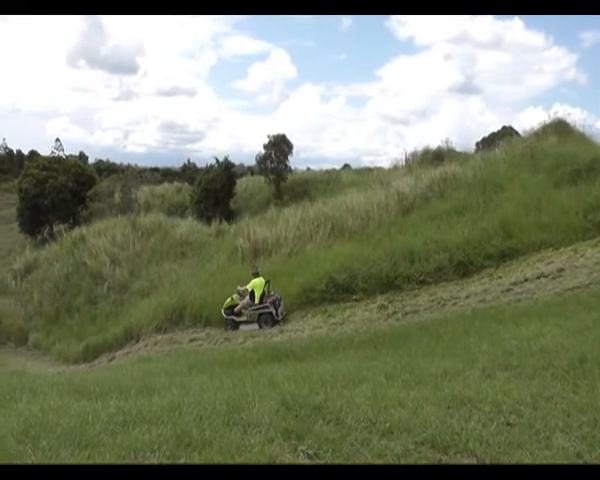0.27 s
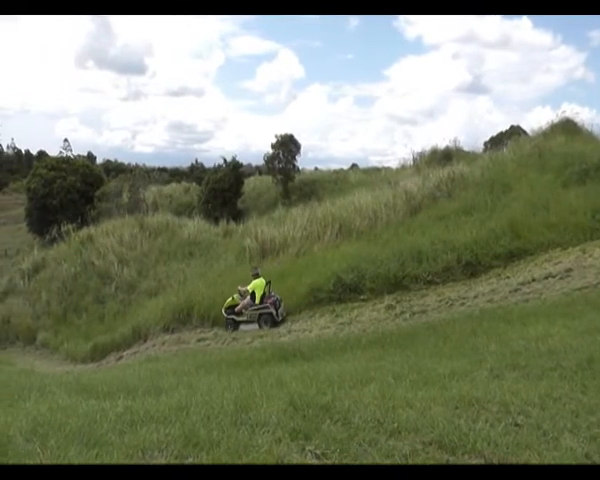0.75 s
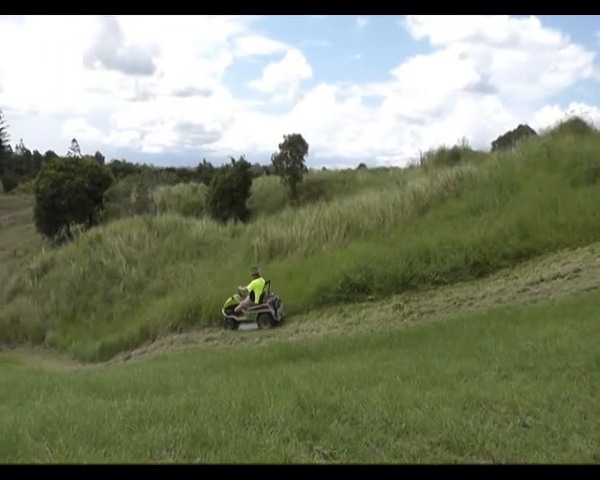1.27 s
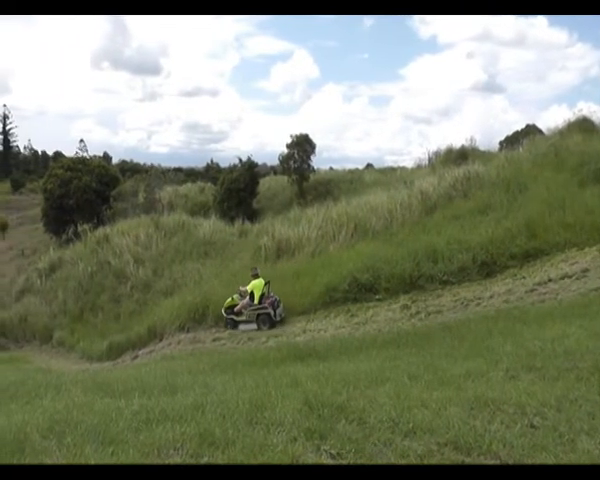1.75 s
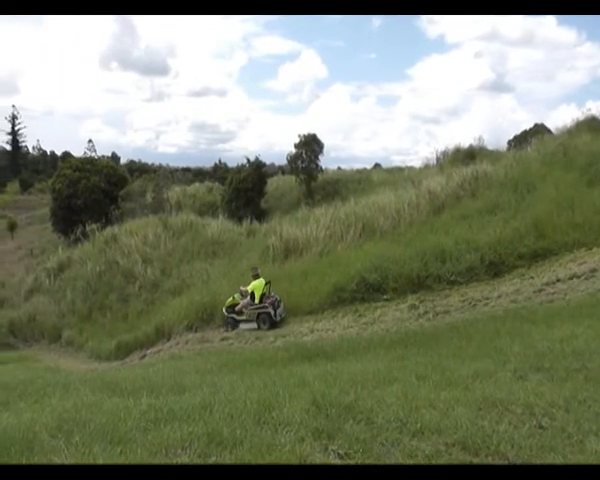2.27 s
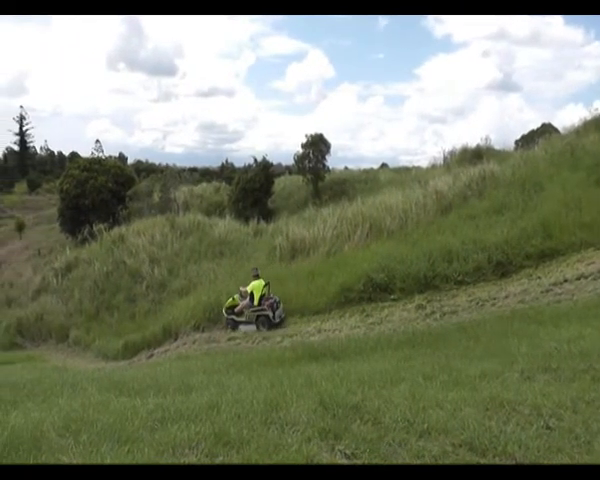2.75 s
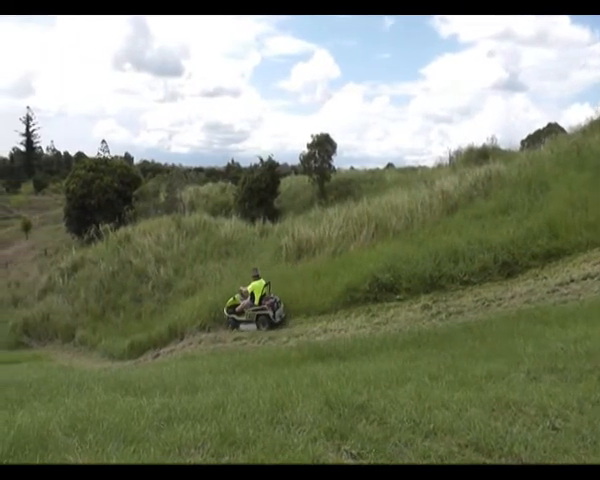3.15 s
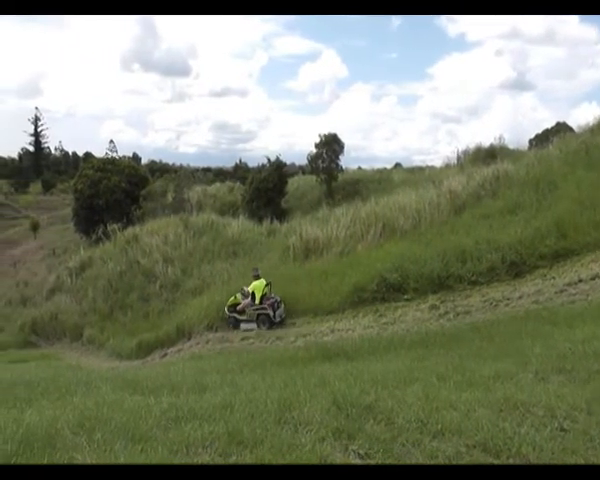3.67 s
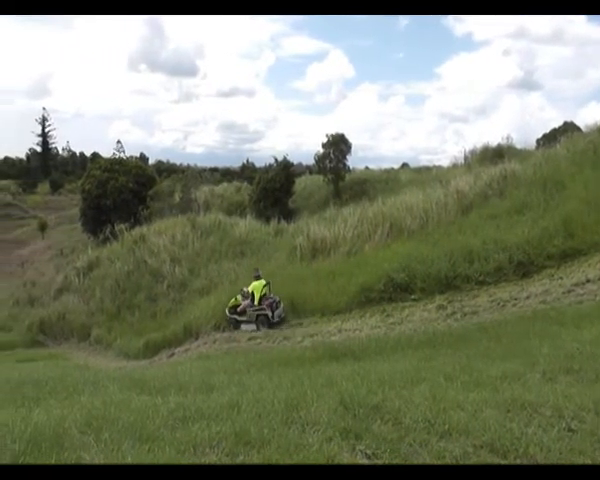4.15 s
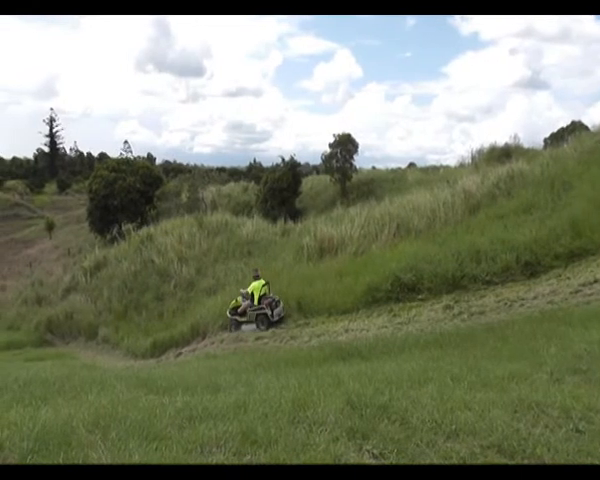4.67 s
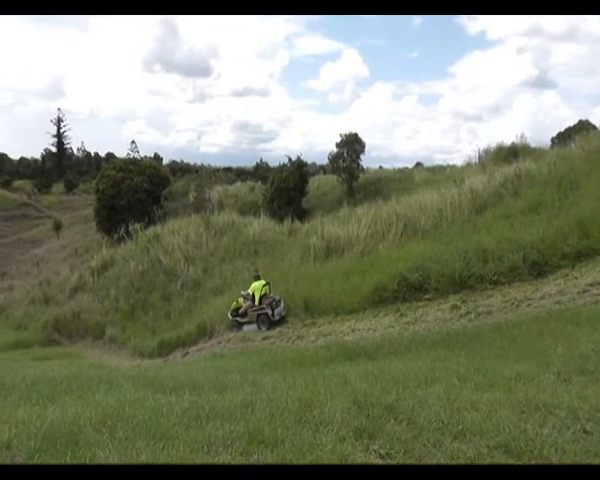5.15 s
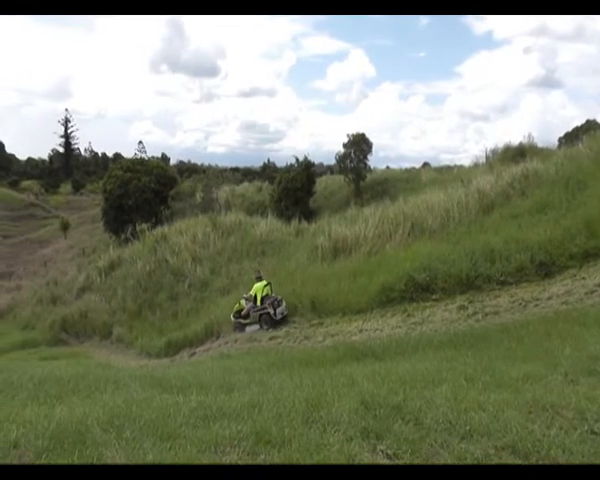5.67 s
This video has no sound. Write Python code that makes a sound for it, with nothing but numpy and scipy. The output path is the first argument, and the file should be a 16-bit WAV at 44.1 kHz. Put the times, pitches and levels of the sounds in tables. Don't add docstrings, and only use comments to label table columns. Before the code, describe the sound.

A small twin-cylinder petrol mower runs throughout, some way off on an open grassy slope and almost centred, creeping very slightly left. The exhaust gives a steady buzzing drone with rasping, clattery casing noise; under it the blade thumps air about fifty times a second and the deck roars, while cut grass adds a bright, rapidly pulsing hiss. The drone and thump swell around 0.6 s. Low wind flutters close on the microphone, with strong buffets near 1.4-1.5 s, then easing. Small stem cracks come at 0.2 and 2.3-2.4 s. The sound dips briefly at 3.2 and 3.9 s, with crackling dry snaps from 3.2 to 4.0 s, the sharpest near 3.9. From 4.6 s the engine strains, sagging lowest around 5.1 s with a rougher, fuller tone; it recovers by 5.6 s. A broad gust passes near 5.5 s; a heavy thud and metallic rattle strike at 5.8 s as pitch sags again.

```python
import sys
import numpy as np
from scipy import signal
from scipy.io import wavfile
from scipy.ndimage import uniform_filter1d

SR = 44100
rng = np.random.default_rng(int(sys.argv[2]) if len(sys.argv) > 2 else 0)


def natural_amplitude(level_db):
    exponent = np.asarray(level_db, float) / 20
    return 10 ** exponent


def file_out(sig):
    cols = np.atleast_2d(sig).T
    lim = np.clip(cols, -1, 1)
    pcm = np.round(lim * 32767).astype(np.int16)
    wavfile.write(sys.argv[1], SR, pcm)


N = 261072


def rms_one(x):
    return x / np.sqrt(np.mean(x ** 2) + 1e-20)


def in_time(rows):
    s, *columns = np.transpose(rows)
    return [np.interp(np.arange(N) / SR, s, c) for c in columns]


def at_hz(points, hz):
    point_hz, value = np.array(points).T
    return np.interp(np.log(hz), np.log(point_hz), value)


def drift(rate):
    stride, settle = 40, 2000
    r = np.exp(-2 * np.pi * rate * stride / SR)
    noise = rng.standard_normal(N // stride + settle + 2)
    slow = signal.lfilter([1], [1, -2 * r, r * r], noise)[settle:]
    return np.interp(np.arange(N) / stride, np.arange(len(slow)), rms_one(slow))


def bump(turns, at, width, lean=0.35):
    angle = 2 * np.pi * (turns - at)
    angle = angle + lean * (np.cos(angle) - 1)
    return np.exp((np.cos(angle) - 1) / (2 * np.pi * width) ** 2)


def swells(events):
    t = np.arange(N) / SR
    return sum(db * np.exp(-((t - s) / length) ** 2) for s, db, length in events)


# frequency in Hz, left-right likeness from 0 to 1.
LIKENESS = [(60, 0.1), (150, 0.83), (370, 0.83), (930, 0.95), (2330, 0.91), (7500, 0.94), (14500, 0.66)]
# frequency in Hz, left minus right in dB.
TILT = [(60, -1), (150, 5), (370, -1.5), (930, 4), (2330, 0), (5810, -0.5), (14500, 5)]


def bands(spectrum, patchy_db, grit_db):
    low, top = np.log2(spectrum[0][0]), np.log2(spectrum[-1][0])
    edges = 2 ** np.linspace(low, top, int(3 * (top - low)) + 2)
    white = rng.standard_normal((2, 2, N)) * natural_amplitude(grit_db * drift(320))
    out, together = 0, drift(8.7)
    for k, (a, b) in enumerate(zip(edges, edges[1:])):
        band = signal.butter(2, [a, b], "band", fs=SR, output="sos")
        mid, side = signal.sosfilt(band, white[k % 2])
        hz = np.sqrt(a * b)
        alike = np.clip(at_hz(LIKENESS, hz), 0, 1)
        flicker_db = patchy_db * (0.28 * together + drift(7.0))
        gain = natural_amplitude(at_hz(spectrum, hz) + flicker_db)
        lean = natural_amplitude(at_hz(TILT, hz) * np.array([[.5], [-.5]]))
        pair = np.sqrt(1 + alike) * mid + np.sqrt(1 - alike) * side * [[1], [-1]]
        out = out + gain * lean * pair
    return rms_one(out)


def partial(turns, multiple, wobble_db, wander, rate):
    level = np.sqrt(2) * natural_amplitude(wobble_db * drift(rate))
    return level * np.cos(2 * np.pi * multiple * turns + wander * drift(rate))


# time in seconds, engine cycles per second, blade passes per second.
SHAFT_SPEED = [(0.0, 27.09, 49.83), (0.4, 26.89, 49.15), (0.8, 27.15, 49.83), (1.4, 27.39, 50.32),
               (1.8, 27.57, 50.75), (2.3, 26.99, 49.63), (3.2, 27.0, 49.63), (3.6, 26.66, 48.8),
               (3.9, 26.86, 49.41), (4.2, 26.77, 49.03), (4.6, 25.97, 47.3), (4.9, 25.79, 46.02),
               (5.1, 24.57, 44.09), (5.2, 24.86, 44.7), (5.45, 26.44, 48.03), (5.6, 26.84, 48.92),
               (5.8, 25.36, 46.34), (5.92, 24.94, 45.59)]


def shafts():
    cycle_rate, pass_rate = in_time(SHAFT_SPEED)
    return np.cumsum(cycle_rate) / SR, np.cumsum(pass_rate) / SR


# time in seconds, drone level in dB, load in dB.
EFFORT = [(0, -32, 0), (.3, -31.5, -9), (.6, -26.5, -10), (.95, -30, 0), (1.25, -27.5, -3.5),
          (2.0, -33, -2.5), (2.4, -34.5, -4), (2.9, -28.5, 3), (3.2, -35, 0), (3.6, -28, -6),
          (4.0, -35, -12), (4.3, -29, -2.5), (4.65, -28, 5), (4.8, -32.5, 13.5), (5.12, -33, 21.5),
          (5.5, -32, 16), (5.68, -28, 7), (5.92, -33, 16)]


def engine_effort():
    return in_time(EFFORT)


# multiple of the engine cycle, level in dB against the drone, share of load from 0 to 1.
ENGINE_ORDERS = [(2.03, -18, 0.1), (3.01, -16.5, 0), (3.94, -23, 0), (5.047, 0.5, 0), (6.035, 1.5, 0.24),
                 (7, -9, 0.27), (8, -11.5, 1), (9.05, -13, 0.8), (10, -9, 0.96), (11.1, -16, 1),
                 (12, -31.5, 0.7), (12.92, -15.5, 0.44), (14.3, -23, 0.54), (15.04, -25, 0.3),
                 (15.98, -19.5, 0.4), (17, -20.5, 0.3), (18.9, -24.5, 0), (20.18, -18.5, 0),
                 (20.87, -28, 0.6), (22.2, -19, 0.3), (24.2, -24, 0.47)]


def exhaust(cycles, drone_db, load_db):
    out = 0
    for multiple, db, share in ENGINE_ORDERS:
        order = round(multiple)
        turns = cycles - 0.57 + 0.0275 * order
        tone = partial(turns, order, wobble_db=1.0 + 1.5 * share, wander=.15 + .45 * share, rate=4.0)
        out = out + natural_amplitude(drone_db + db + share * load_db) * tone
    return out


# firing point as a share of the cycle, strength in dB.
FIRINGS = [(.03, 1), (.42, 1)]


def firings(cycles, width):
    return sum(natural_amplitude(db) * bump(cycles, at, width) for at, db in FIRINGS)


# multiple of the engine cycle, level in dB against the clatter.
CASING_ORDERS = [(30, -22.5), (32, -29), (36, -27), (38, -36), (39, -20.5), (40, -19.5), (42, -17.5),
                 (43, -18), (44, -22.5), (45, -18), (47, -22), (50, -21.5), (52, -21), (54, -20.5)]
# frequency in Hz, density in dB per Hz.
CLATTER = [(600, -20), (900, -9.5), (1150, -2.5), (1500, 1.5), (2200, -0.5), (2800, 0), (3800, -0.5),
           (4800, -7.5), (7000, -7)]


def casing(cycles, clatter_db, load_db, puff):
    lines = 0
    for k, db in CASING_ORDERS:
        turns = cycles + k ** 2 / 97
        lines = lines + natural_amplitude(db) * partial(turns, k, wobble_db=3, wander=0.72, rate=5.7)
    throb = 1 + (.5 + 1.3 * puff) * firings(cycles, width=0.1)
    shell_hz, shell_width_hz = 2780, 550
    resonance = signal.iirpeak(shell_hz, shell_hz / shell_width_hz, SR)
    shell = signal.lfilter(*resonance, rng.standard_normal(N))
    lag_s = 0.32
    late_load_db = np.interp(np.arange(N) - lag_s * SR, np.arange(N), load_db)
    rasp = natural_amplitude(-14.5 + .5 * late_load_db) * rms_one(shell)
    noise = bands(CLATTER, patchy_db=1.1, grit_db=1.0) + rasp
    return natural_amplitude(clatter_db) * (lines + natural_amplitude(1.29) * rms_one(throb * noise))


# time in seconds, thickness as thump in dB, dryness as slash depth from 0 to 1.
GRASS = [(0, -41, 0.76), (.3, -39, 0.3), (.6, -27.5, 0.1), (.8, -31.5, 0.26), (1.2, -40, 0.42),
         (1.6, -39.5, 0.55), (1.8, -44.5, 0.6), (2.3, -35, 0.6), (2.7, -37.5, 0.33), (3.0, -44, 0.67),
         (4.0, -42, 0.76), (4.25, -34, 0), (4.6, -34.5, .4), (4.82, -30, 0.16), (5.0, -31.5, 0.5),
         (5.45, -48, 0.5), (5.62, -36, 0), (5.92, -37, 0.17)]


def grass():
    thump_db, slash = in_time(GRASS)
    return thump_db, np.clip(slash, 0, 1)


# multiple of the blade pass, level in dB against the thump.
BLADE_ORDERS = [(2, -14.5), (2.5, -22), (3, -1), (3.5, -14), (4, 2), (4.5, -10), (5, 0), (6, -9), (7, -8),
                (8, -10), (9, -10.5), (10, -12), (11, -14.5), (13, -18.5)]
# frequency in Hz, density in dB per Hz.
ROAR = [(60, -12), (110, -9.5), (160, 1), (250, 2.5), (330, -7), (520, -5), (700, -16), (950, -17.5),
        (1400, -25)]


def deck(cycles, passes, thump_db, roar_db):
    beat = sum(natural_amplitude(db) * partial(passes, k, wobble_db=3.0, wander=.5, rate=3.47) for k, db in BLADE_ORDERS)
    chug = rms_one(1 + 0.32 * bump(cycles, at=0.33, width=0.13))
    roar = chug * bands(ROAR, patchy_db=1.0, grit_db=0.2)
    return natural_amplitude(thump_db) * beat + natural_amplitude(roar_db + 2.0) * roar


# time in seconds, point as a share of a pass.
SLASH_AT = [(0, 0.78), (1, 0.57), (3, 0.51), (4.2, 0.5), (4.5, 0.43), (5.2, 0.53), (5.92, 0.41)]


def since_slash(passes):
    return passes - in_time(SLASH_AT)[0]


# frequency in Hz, density in dB per Hz.
SWISH = [(2000, -15), (3500, -3), (5000, -3), (7000, 1), (10000, -0.5), (11500, 3), (13000, 1),
         (15500, -18)]


def swish(cycles, passes, swish_db, slash, puff):
    since = since_slash(passes)
    count = int(passes[-1]) + 2
    strength, early = rng.standard_normal((count, 2)).T
    which = np.clip(np.floor(since + .5).astype(int) + 1, 0, count - 1)
    hump = bump(since, 0.065 * early[which], width=0.14 - 0.055 * slash, lean=1.0)
    burst = natural_amplitude(1.1 * strength[which]) * hump
    steady = np.clip(1 - 1.28 * slash, 0, 1) * np.clip(1 - 1.1 * puff, 0, 1)
    gate = 0.081 + steady + 2.4 * slash * burst + 5.5 * puff * firings(cycles, width=0.081)
    gate = gate / np.sqrt(uniform_filter1d(gate ** 2, size=SR // 8))
    return natural_amplitude(swish_db + 3.5) * gate * bands(SWISH, patchy_db=1.04, grit_db=2.5)


# time in seconds, extra swish in dB, length in seconds.
TUFTS = [(.05, 3, 0.15), (.3, 4, 0.066), (1.02, 1, 0.044), (1.5, 4, 0.067), (1.85, 2.5, .08),
         (2.43, 2.5, 0.045), (2.62, 3.5, .1), (3.05, 3, 0.18), (3.7, 2.5, 0.063), (4.35, 1.5, .15),
         (4.9, 4.5, .17), (5.77, 4, .04), (5.92, 0, 0.035)]


def tufts():
    return swells(TUFTS)


# time in seconds, level in dB.
CARRY = [(0, -2), (.43, -2), (.64, 3.5), (.91, -0.5), (1.05, 2), (1.5, 3), (1.65, 0), (2.3, -0.5),
         (2.5, -2.5), (2.8, 2), (3.19, -3), (3.24, -8.5), (3.45, -1.5), (3.68, -1.5), (3.91, -9.5),
         (4.2, -4.5), (4.7, 2), (5.92, 1.5)]


def carry():
    return in_time(CARRY)[0]


# time in seconds, lift over the breeze in dB, length in seconds.
GUSTS = [
    (.28, 5, .06),
    (.72, 6, .06),
    (1.05, 6, .04),
    (1.38, 12, .04),
    (1.51, 11, .06),
    (2.1, 4, 0.4),
    (3.72, 6, 0.11),
    (4.8, -2, .05),
    (5.55, 8, .25),
]


def breeze():
    return -33 - 1.7 * np.arange(N) / SR + swells(GUSTS)


# frequency in Hz, density in dB per Hz.
WIND = [(25, -21), (45, -10), (70, -4.5), (100, -0.5), (125, -2), (150, -30)]


def wind(wind_db):
    return natural_amplitude(wind_db - 3) * bands(WIND, patchy_db=1.5, grit_db=.3)


def rings(events, decay_s, trim_db):
    out, t = np.zeros(N), np.arange(SR // 20) / SR
    rough = 1 + 0.7 * rng.standard_normal((len(events), len(t)))
    shape = np.e * t / decay_s * np.exp(-t / decay_s)
    for (s, db, hz), grain in zip(events, rough):
        i = round(s * SR)
        ring = natural_amplitude(db + trim_db) * shape * grain * np.sin(2 * np.pi * hz * t)
        out[i:i + len(t)] += ring[:N - i]
    return out


# start in seconds, end in seconds, level in dB, pitch in Hz.
DRY_PATCHES = [
    (3.19, 3.37, -12.5, 9680),
    (3.65, 3.94, -9.5, 9900),
    (3.94, 4.04, -11.5, 7660),
]


def dry_snaps(passes):
    since = since_slash(passes) + .04
    times = np.flatnonzero(np.diff(np.floor(since)) > 0) / SR
    chance = rng.standard_normal((400, 2))
    snaps = []
    for start, end, db, hz in DRY_PATCHES:
        for s, (a, b) in zip(times, chance):
            if start < s < end:
                snaps.append((s, db + 2.5 * a, hz + 900 * b))
    return snaps


# time in seconds, peak in dB, pitch in Hz.
LONE_SNAPS = [
    (0.1775, -8, 3800),
    (1.8711, -19, 3760),
    (2.3096, -10, 8800),
    (2.4329, -7, 5400),
    (3.0365, -10, 5980),
    (3.4994, -20, 3610),
    (3.8916, -3.5, 10350),
    (4.8973, -7, 6870),
    (4.9342, -11, 7100),
]


def stem_snaps(passes):
    return rings(LONE_SNAPS + dry_snaps(passes), decay_s=0.00037, trim_db=-10)


# time in seconds, peak in dB, ring in Hz.
KNOCKS = [
    (0.829, -19, 630),
    (3.219, -30, 500),
    (3.659, -18, 506),
    (5.738, -13, 1250),
    (5.759, -16, 686),
    (5.782, -1.5, 214),
    (5.784, -14, 760),
    (5.785, -11, 1790),
    (5.81, -9, 1765),
]


def deck_knocks():
    return rings(KNOCKS, decay_s=0.0026, trim_db=-13.0)


def scene():
    cycles, passes = shafts()
    drone_db, load_db = engine_effort()
    thump_db, slash = grass()
    carry_db, tuft_db = carry(), tufts()
    puff = 0.054
    roar_db = -32 + 0.75 * carry_db + .15 * (thump_db - thump_db.mean()) + 0.44 * tuft_db
    clatter_db = -32.5 + 0.87 * carry_db - 0.06 * load_db + 0.14 * tuft_db
    swish_db = -35 + 0.081 * carry_db + tuft_db + 0.17 * slash + 1.0 * drift(4.0)
    body = exhaust(cycles, drone_db, load_db) + deck(cycles, passes, thump_db, roar_db)
    bank = natural_amplitude(-27.5) * np.roll(body, round(0.0107 * SR), axis=1) * [[1], [-1]]
    mower = body + bank + casing(cycles, clatter_db, load_db, puff)
    mower = mower + swish(cycles, passes, swish_db, slash, puff)
    mower = mower + stem_snaps(passes) + deck_knocks()
    pan_db = np.linspace(-.4, .4, N)
    return mower * natural_amplitude(pan_db * [[.5], [-.5]]) + wind(breeze())


def top_cut(x):
    return signal.sosfilt(signal.butter(12, 15100, fs=SR, output="sos"), x)


def record(dry):
    x = signal.sosfilt(signal.butter(2, 30, "high", fs=SR, output="sos"), dry)
    cavity_hz, cavity_width_hz = 11700, 1600
    cavity = signal.iirpeak(cavity_hz, cavity_hz / cavity_width_hz, SR)
    x = x - 0.63 * signal.lfilter(*cavity, x)
    top_hz, edge_hz = 13850, 14500
    edge = signal.sosfilt(signal.butter(4, [top_hz, edge_hz], "band", fs=SR, output="sos"), x)
    bright = uniform_filter1d(edge.mean(0) ** 2, size=round(.014 * SR))
    is_open = 1. * (bright > np.quantile(bright, 1 - .1))
    gate = uniform_filter1d(is_open, size=SR // 200)
    x = signal.sosfilt(signal.ellip(10, .2, 65, top_hz, fs=SR, output="sos"), x)
    return top_cut(x + natural_amplitude(-13) * gate * edge)


dry = scene()
out = record(dry)
file_out(out)
```